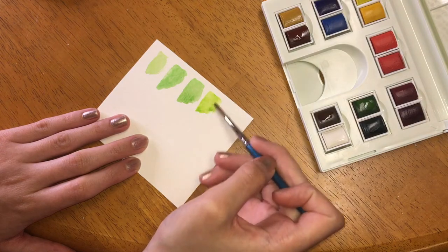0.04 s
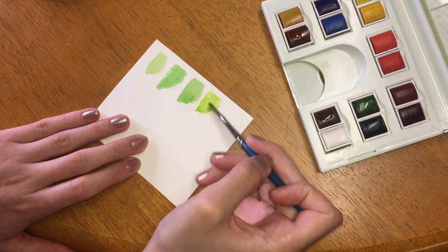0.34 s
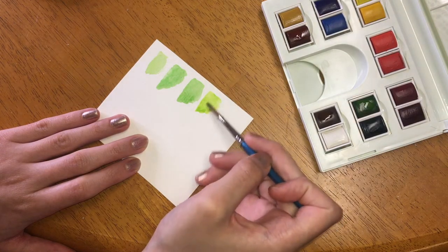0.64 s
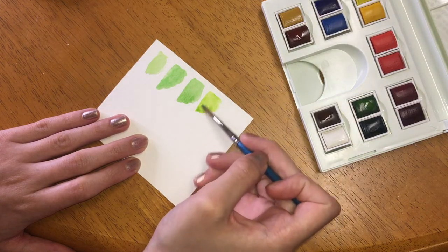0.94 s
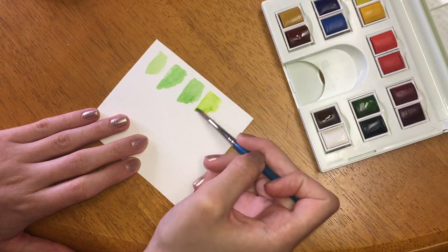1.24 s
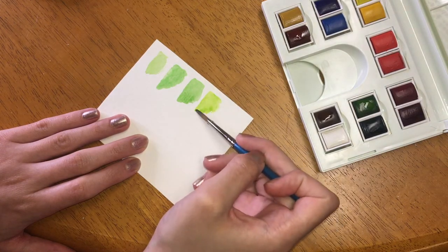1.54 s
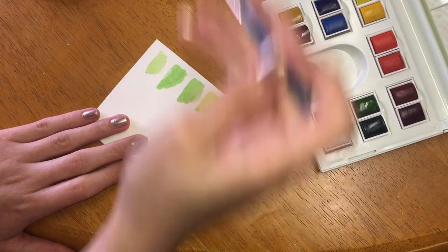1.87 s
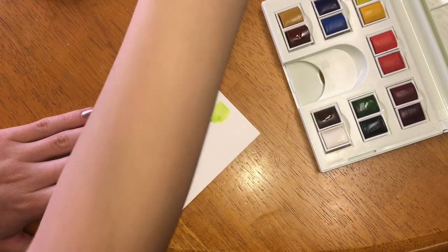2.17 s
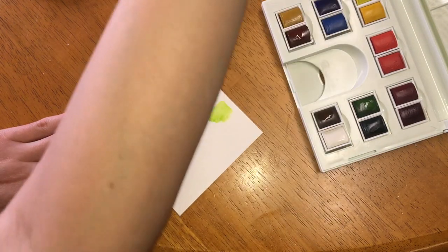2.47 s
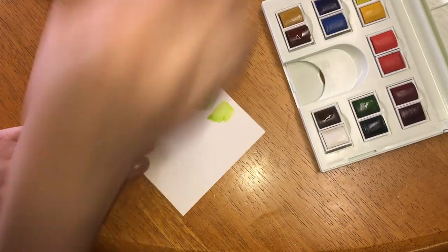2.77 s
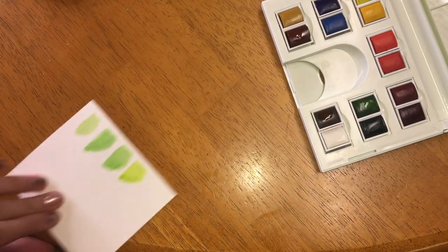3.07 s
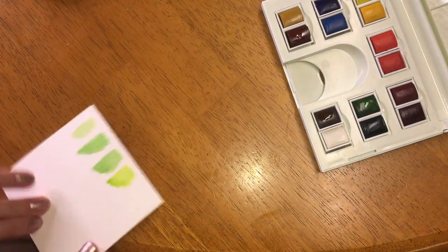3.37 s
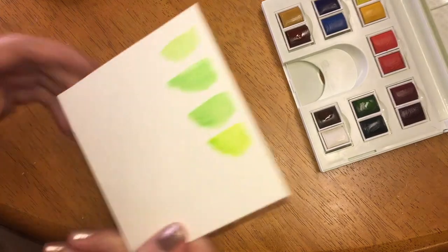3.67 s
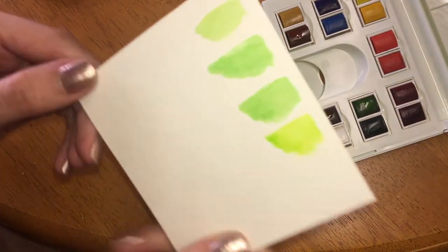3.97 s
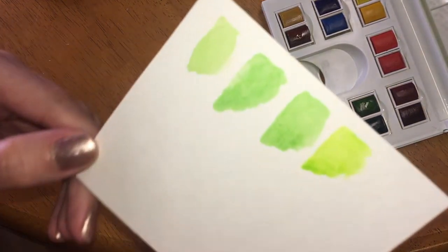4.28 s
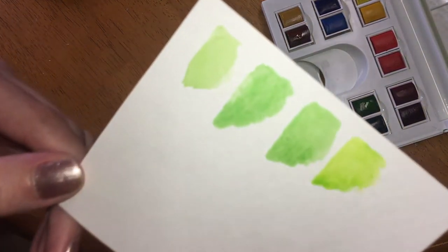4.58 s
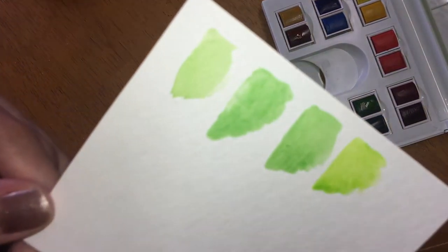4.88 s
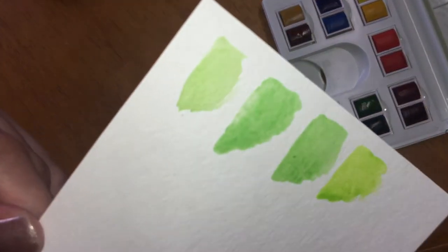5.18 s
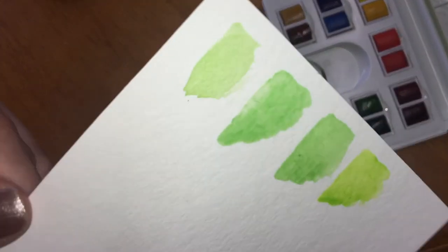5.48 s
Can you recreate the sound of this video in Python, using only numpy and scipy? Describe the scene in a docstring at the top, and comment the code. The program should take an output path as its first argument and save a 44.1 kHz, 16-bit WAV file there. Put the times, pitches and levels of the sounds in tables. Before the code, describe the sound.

Faint paintbrush dabs, then the brush clinks sharply against glass and a card is slid off a desk and handled, over low hum.

```python
"""A paintbrush, set down, bounces against something hard and glassy: each blow rings the glass modes and gives
a short click with a low knock. Before that its bristles dab at a card. Afterwards the card hisses over the
wooden desk, scrapes off its edge and is turned in the fingers close to the microphone, with rubs, taps and soft
flexing thumps. Arm movements shake the desk. Behind it all is a quiet room with the swish of a slow fan and a
low motor hum."""
import sys
import numpy as np
from scipy import signal
from scipy.fft import rfft, irfft
from scipy.io import wavfile

SR = 44100
rng = np.random.default_rng(int(sys.argv[2]) if len(sys.argv) > 2 else 0)


def generate_wav(signal):
    """Clip the signal to [-1, 1] and save it as 16-bit WAV at the path in sys.argv[1]."""
    frames = np.transpose(np.atleast_2d(signal))
    scaled = np.clip(frames, -1, 1) * 32767
    pcm = np.round(scaled).astype(np.int16)
    wavfile.write(sys.argv[1], SR, pcm)


N = 252252
T = np.arange(N) / SR
HZ = np.fft.rfftfreq(N, 1 / SR) + 1


# pitch_hz, rim_level_db, wall_level_db, t60_s
GLASS_MODES = [(645, -39.5, -51.5, 0.073), (2290, -49, -45, 0.35), (3640, -42, -53, 0.312),
               (3795, -33.5, -34, .22), (8600, -39.5, -28, .09), (8790, -12, -22, 0.23),
               (9400, -33, -38.5, 0.114), (9660, -22.5, -39, .11), (9880, -43.5, -36.5, .25),
               (10800, -54, -51, .2), (10920, -41.5, -44.5, .07), (11450, -14, -43, .08),
               (11810, -23.5, -40, 0.11), (12210, -16.5, -22.5, .11), (12330, -17.5, -24.5, .13),
               (12935, -9, -19, .115), (14940, -48.5, -48.5, .14), (15660, -43, -45, 0.11)]
# freq_hz, density_db
CLICK_SPECTRUM = [(200, -25.5), (480, -22), (645, -12.5), (790, -31), (1300, -22.5), (2900, -28.5),
                  (4300, 0), (5000, -20.5), (5800, 1.5), (6300, -14), (8700, 11.5), (10450, -14),
                  (11600, 5), (13000, -7), (14200, -3.5)]
# start_s, level_db, place (0 rim, 1 wall), hardness_db_per_octave
BRUSH_BLOWS = [(2.468, -49, 0.67, 9), (2.545, -43, 0.62, 8.5), (2.738, -1, 0.029, -1),
               (2.7688, 0.5, 0.1, 2.5), (2.8038, -0.5, 0.49, 5.5), (2.8351, 3.5, 1, 5.5)]

def brush_clink(attack_s=.0006, pivot_hz=8800, wall_damping=.9, click_t60_s=.019):
    """Each bounce adds energy to the ringing glass modes and gives a short click with a knock near 645 Hz."""
    out, t = np.zeros(N), T[:SR // 2]
    hz, rim_db, wall_db, t60_s = np.transpose(GLASS_MODES)[:, :, None]
    click_spectrum = spectrum_db(CLICK_SPECTRUM)
    click_rim_db, click_wall_db = -14, -25
    ringing = np.zeros_like(hz)
    blows = BRUSH_BLOWS + settling_hops()
    gaps_s = list(np.diff([blow[0] for blow in blows])) + [.5]
    for (start_s, level_db, place, hardness), gap_s in zip(blows, gaps_s):
        age_s = t[:round((start_s + gap_s) * SR) - round(start_s * SR) + 1]
        mode_db = rim_db + place * (wall_db - rim_db)
        tilt_db = hardness * np.maximum(np.log2(hz / pivot_hz), -2)
        struck = amp(level_db + mode_db + tilt_db) * (1 - np.exp(-age_s / attack_s))
        # a push a quarter cycle from the motion adds its energy to the ring
        push = 1j * rng.choice([-1, 1], hz.shape) * np.exp(1j * np.angle(ringing))
        damping = 1 + wall_damping * place  # the brush lies against the wall
        motion = (ringing + push * struck) * np.exp(2j * np.pi * hz * age_s)
        motion *= decay(age_s, t60_s / damping)
        add(out, start_s, motion[:, :-1].real.sum(0))
        ringing = motion[:, -1:]
        # the click is strongest at the rim and in dull blows
        click_db = level_db + click_rim_db + place * (click_wall_db - click_rim_db) - 1.25 * hardness
        click = noise(len(t), click_spectrum) * decay(t, click_t60_s)
        add(out, start_s, amp(click_db) * click)
    return out


def settling_hops(start_s=2.8512, first_gap_s=.011, gap_ratio=.75, count=4):
    """The brush's last blows, each hop shorter and weaker than the one before."""
    first_db, step_db, place, hardness_db_per_octave = -19, -3.2, .6, -7.5
    gaps_s = first_gap_s * gap_ratio ** np.arange(count - 1)
    times_s = start_s + np.r_[0, np.cumsum(gaps_s)]
    return [(hop_s, first_db + hop * step_db, place, hardness_db_per_octave)
            for hop, hop_s in enumerate(times_s)]


# freq_hz, density_db
HISS_SPECTRUM = [(1470, -23), (2500, -18.5), (3150, -9.5), (3790, -17), (4970, -10.5), (6660, -4),
                 (7590, -9.5), (8860, -0.5), (9420, 0.5), (10200, -4), (12200, 1), (15000, -2),
                 (15800, -15)]
# freq_hz, density_db
SCRAPE_SPECTRUM = [(300, -5), (600, -12.5), (1100, -3), (2000, -4.5), (3200, -5), (5000, -3.5), (8000, -12)]
# full_speed_s, hold_s, hiss_level_db
CARD_PULLS = [(2.956, 0.14, -36.5), (3.33, 0.013, -56.5)]

def card_slide(start_s=2.89, end_s=3.41, rise_db_per_s=324, fall_db_per_s=143, flutter_db=1.3):
    """Paper fibres catch on wood grain: a bright hiss follows the speed, over a steadier low scrape."""
    hiss_db = np.full(N, -np.inf)
    for full_speed_s, hold_s, level_db in CARD_PULLS:
        speeding_db = rise_db_per_s * np.maximum(full_speed_s - T, 0)
        slowing_db = fall_db_per_s * np.maximum(T - full_speed_s - hold_s, 0)
        hiss_db = np.maximum(hiss_db, level_db - speeding_db - slowing_db)
    scrape_db = -54 + .17 * (hiss_db - hiss_db.max())
    hiss = amp(hiss_db) * coloured(grit(N, spread_db=2.5), spectrum_db(HISS_SPECTRUM))
    scrape = amp(scrape_db) * coloured(grit(N, spread_db=3.5), spectrum_db(SCRAPE_SPECTRUM))
    moving = (T > start_s) & (T < end_s)
    return moving * (hiss + scrape) * amp(flutter_db * drift(rate_hz=29))


def edge_scrape(peak_s=3.432, length_s=.049, centre_hz=2800, fall_octaves_per_s=12, tone_db=-50):
    """The card rasps over the desk's edge; its resonance falls as more of it hangs free."""
    pitch_hz = centre_hz * 2 ** (-fall_octaves_per_s * np.clip(T - peak_s, -length_s, length_s))
    tone = drift(rate_hz=480) * np.sqrt(2) * np.cos(2 * np.pi * np.cumsum(pitch_hz) / SR)
    rasp = rub(peak_s, length_s, level_db=-48, tilt_db_per_octave=-.4, resonance_hz=3500, lift_db=4)
    return amp(tone_db) * stroke(peak_s, length_s) * tone + rasp


# start_s, level_db, pitch_hz, t60_s
CARD_FLEXES = [(3.358, -39.5, 171, 0.079), (3.688, -27, 173, 0.066), (3.735, -37.5, 216, 0.086)]

def card_flexes(rise_s=.0034):
    """The stiff card bends and swings for a few cycles: a soft thump."""
    out, t = np.zeros(N), T[:SR // 4]
    for start_s, level_db, pitch_hz, t60_s in CARD_FLEXES:
        envelope = (1 - np.exp(-(t / rise_s) ** 2)) * decay(t, t60_s)
        add(out, start_s, amp(level_db) * envelope * np.sin(2 * np.pi * pitch_hz * t))
    return out


# start_s, level_db, centre_hz, width_octaves, t60_s
CARD_TAPS = [(3.0235, -30.5, 2600, 4, 0.0098), (3.262, -57, 420, 0.29, 0.15),
             (3.36, -48.5, 260, 0.82, 0.089), (3.3857, -39.5, 4250, 1.1, 0.027),
             (3.838, -50.5, 1600, 2.9, .05), (3.997, -42, 1200, 1.2, 0.024), (3.999, -39, 398, 0.5, 0.027)]

def card_taps():
    """Card edge and fingernails knock with no clear ring."""
    out, t = np.zeros(N), T[:SR // 4]
    for start_s, level_db, centre_hz, width_octaves, t60_s in CARD_TAPS:
        knock = band_noise(len(t), centre_hz, width_octaves) * decay(t, t60_s)
        add(out, start_s, amp(level_db) * knock)
    return out


# freq_hz, density_db
PAPER_SPECTRUM = [(200, -11.5), (700, -7), (1400, -3.5), (4500, -2.5), (9000, 4), (15000, 0.5)]

def rub(peak_s, length_s, level_db, tilt_db_per_octave, resonance_hz, lift_db):
    """One gritty friction stroke: the spectrum of paper, tilted, with one resonance lifted."""
    tilt_db = tilt_db_per_octave * np.log2(HZ / resonance_hz)
    resonance_db = lift_db * bell(resonance_hz, width_octaves=.14)
    friction = coloured(grit(SR, spread_db=2.5), spectrum_db(PAPER_SPECTRUM) + tilt_db + resonance_db)
    out = stroke(peak_s, length_s)
    during = np.flatnonzero(abs(T - peak_s) < length_s)
    out[during] *= friction[:len(during)]
    return amp(level_db) * out


# peak_s, length_s, level_db, tilt_db_per_octave, resonance_hz
FINGER_RUBS = [(1.957, 0.04, -57.5, -0.5, 11400), (3.612, .2, -59, -2, 5707),
               (3.702, 0.092, -50.5, -0.5, 12800), (3.759, 0.12, -51, 0, 8600),
               (3.866, 0.06, -52.5, -4, 6400), (3.916, 0.058, -57, -3, 6800), (4.045, .11, -50.5, -2, 1700),
               (4.122, .08, -55.5, -2.5, 1580), (4.208, .14, -59.5, -2.5, 3450),
               (4.715, 0.048, -56.5, 1, 9200), (4.956, .11, -57, -4.5, 11100)]

def finger_rubs():
    """Fingers shift on what they hold; the grip sets which resonance stands out."""
    return sum(rub(*row, lift_db=7.5) for row in FINGER_RUBS)


# peak_s, level_db, resonance_hz
BRISTLE_DABS = [(0.266, -66, 3520), (.55, -63, 5800), (0.869, -66, 5500), (1.18, -63.5, 4570),
                (1.37, -67.5, 3300), (1.56, -63, 4430)]

def bristle_dabs(length_s=.075, tilt_db_per_octave=-4):
    """The bristles touch the card in short, similar strokes."""
    return sum(rub(peak_s, length_s, level_db, tilt_db_per_octave, resonance_hz, lift_db=8)
               for peak_s, level_db, resonance_hz in BRISTLE_DABS)


def lift_and_reach():
    """The brush leaves the card with a thin swish; the arm crosses the desk with a broader one."""
    lift = rub(1.86, length_s=.27, level_db=-65, tilt_db_per_octave=5, resonance_hz=5850, lift_db=14)
    reach = rub(2.16, length_s=.38, level_db=-62, tilt_db_per_octave=1, resonance_hz=13000, lift_db=2)
    return lift + reach


# peak_s, length_s, level_db
ARM_MOVES = [(2.25, 0.88, -55), (3.345, 0.17, -42), (3.719, 0.11, -47), (3.893, 0.38, -50.5),
             (4.359, .34, -49.5), (5.35, 0.25, -55.5)]

def desk_rumble():
    """Moving arms shake the desk at very low frequency."""
    envelope = sum(amp(level_db) * stroke(peak_s, length_s) for peak_s, length_s, level_db in ARM_MOVES)
    return envelope * band_noise(N, centre_hz=53, width_octaves=.26)


# freq_hz, density_db
FAN_SPECTRUM = [(500, -4.5), (880, -9.5), (1120, 2.5), (1400, -1), (1680, 1), (2050, -7), (2600, -20.5),
                (5000, -26)]

def fan(level_db=-68, passes_per_s=4.8, first_pass_s=.295, uneven_db=2.37):
    """A faint swish that swells each time a blade passes."""
    swell = 1 + .25 * np.cos(2 * np.pi * passes_per_s * (T - first_pass_s))
    gain = amp(level_db + uneven_db * drift(rate_hz=19))
    return gain * swell * noise(N, spectrum_db(FAN_SPECTRUM))


# pitch_hz, rms_db, unsteadiness (0 to 1), flutter_hz
HUM_TONES = [(59, -59, 0.9, 5), (117, -64.5, .7, 5), (161.8, -57, 0.3, 16), (204.6, -70.5, .8, 6),
             (247, -70, .8, 6), (355.4, -55, .08, 4), (712, -80.5, .3, 4), (1053, -79.5, .5, 4),
             (1712, -80, 0.4, 6), (10035, -75, .25, 30), (11995, -77.5, .8, 70)]

def hum():
    """Motor tones and thin electronic whines flutter in strength and phase."""
    out = np.zeros(N)
    for pitch_hz, rms_db, unsteadiness, flutter_hz in HUM_TONES:
        steady = np.sqrt(2 * (1 - unsteadiness ** 2))
        flutter = unsteadiness * (drift(flutter_hz) + 1j * drift(flutter_hz))
        carrier = np.exp(2j * np.pi * (pitch_hz * T + rng.random()))
        out += amp(rms_db) * ((steady + flutter) * carrier).real
    return out


# freq_hz, density_db
AIR_SPECTRUM = [(20, -20), (38, 3.5), (75, -3.5), (190, -1.5), (300, -7), (480, -15.5), (880, -23.5),
                (1120, -21.5), (1700, -34), (2300, -27), (3500, -27), (4900, -33), (5900, -27.5),
                (7500, -31), (9500, -28.5), (15000, -26)]

def room_air(rms_db=-56):
    """The steady, mostly low noise of the room's air."""
    return amp(rms_db) * noise(N, spectrum_db(AIR_SPECTRUM))


def with_reflections(x, wet_db=-13, t60_s=.16, echoes_per_s=2000):
    """Adds sparse, quickly dying echoes from the desk and nearby things."""
    t = T[:SR // 3]
    echoes = rng.standard_normal(len(t)) * decay(t, t60_s)
    echoes *= rng.random(len(t)) < echoes_per_s / SR
    return x + amp(wet_db) * signal.fftconvolve(x, echoes / np.linalg.norm(echoes))[:N]


def amp(db):
    """Decibels to gain."""
    return 10 ** (np.asarray(db) / 20)


def decay(t, t60_s):
    """Exponential fall of 60 dB in t60_s."""
    return np.exp(-np.log(1000) * t / t60_s)


def stroke(peak_s, length_s, rise_share=.41):
    """Speed of one hand movement: swells to one at peak_s and dies away."""
    rise_s = length_s * rise_share
    progress = (T - peak_s) / np.where(T < peak_s, rise_s, length_s - rise_s)
    return np.cos(np.pi / 2 * np.clip(progress, -1, 1))


def spectrum_db(table):
    """Interpolates a spectrum table over HZ on a log-frequency axis."""
    freq_hz, density_db = np.transpose(table)
    return np.interp(np.log(HZ), np.log(freq_hz), density_db)


def bell(centre_hz, width_octaves):
    """A smooth hump of height one over HZ."""
    return np.exp(-.5 * (np.log2(HZ / centre_hz) / width_octaves) ** 2)


def coloured(x, shape_db):
    """Filters x by shape_db (over HZ) and scales it to rms one."""
    gain = np.interp(np.fft.rfftfreq(len(x), 1 / SR), HZ, amp(shape_db))
    shaped = irfft(rfft(x) * gain, len(x))
    return shaped / np.sqrt(np.mean(shaped ** 2) + 1e-20)


def noise(size, shape_db):
    """Shaped Gaussian noise of rms one."""
    return coloured(rng.standard_normal(size), shape_db)


def band_noise(size, centre_hz, width_octaves):
    """Noise of rms one in a bell-shaped band."""
    return noise(size, 20 * np.log10(bell(centre_hz, width_octaves) + 1e-6))


def drift(rate_hz):
    """Random wander of rms one, mostly below rate_hz."""
    return noise(N, -20 * np.log10(1 + (HZ / rate_hz) ** 2))


def grit(size, spread_db, slip_samples=16):
    """Friction noise made of tiny slips of uneven strength."""
    slips = np.repeat(rng.standard_normal(size // slip_samples + 1), slip_samples)[:size]
    return rng.standard_normal(size) * amp(spread_db * slips)


def add(mix, start_s, sound):
    """Mixes a sound in at start_s."""
    part = mix[max(round(start_s * SR), 0):][:len(sound)]
    part += sound[:len(part)]


def scene():
    """All sources at one microphone."""
    brush = bristle_dabs() + lift_and_reach() + brush_clink()
    card = card_slide() + edge_scrape() + finger_rubs() + card_taps() + card_flexes()
    background = room_air() + hum() + fan() + desk_rumble()
    return (with_reflections(brush + card) + background)[None]


def record(dry):
    """The recorder's band limit."""
    lowpass = signal.firwin(511, cutoff=15850, window=("kaiser", 9), fs=SR)
    return signal.oaconvolve(dry, lowpass[None], "same", axes=1)


dry = scene()
out = record(dry)
generate_wav(out)
```